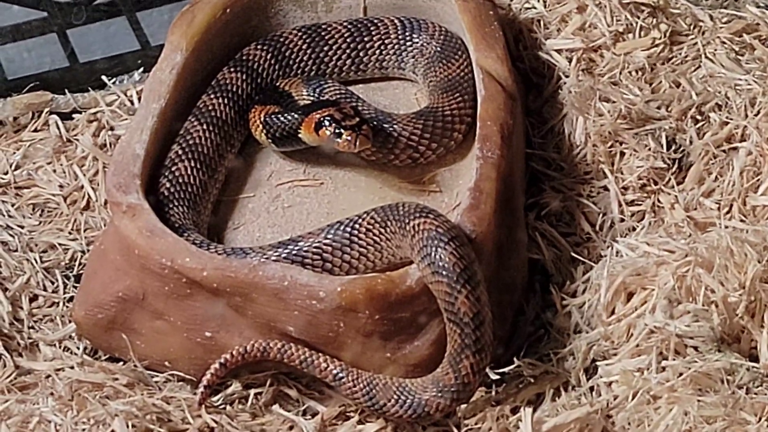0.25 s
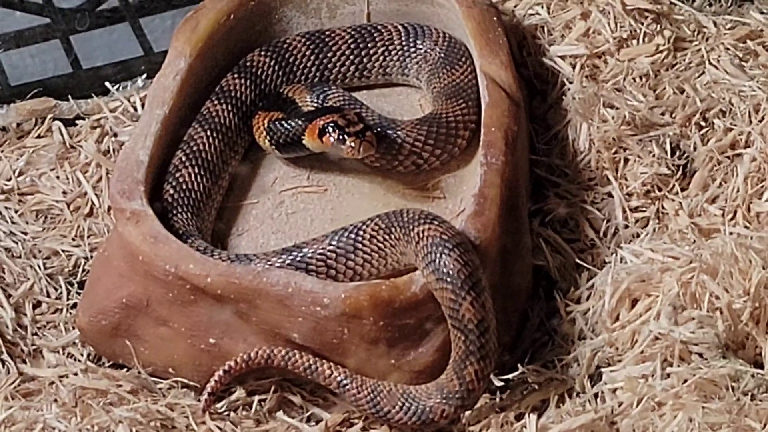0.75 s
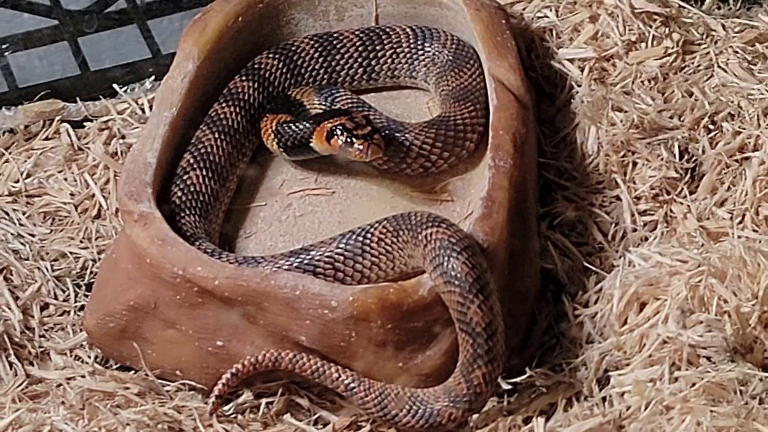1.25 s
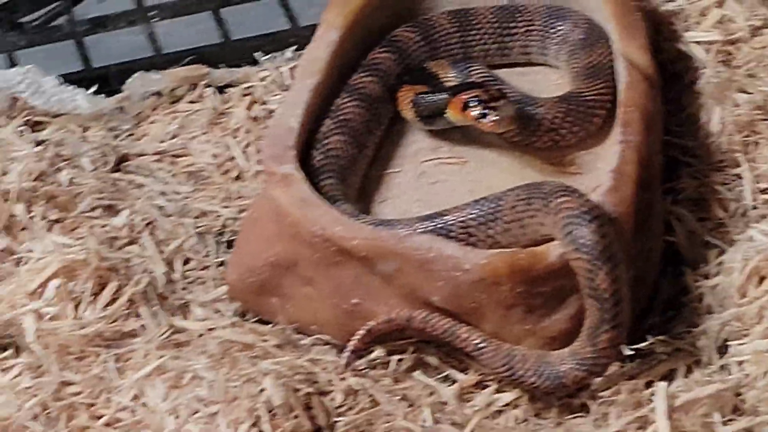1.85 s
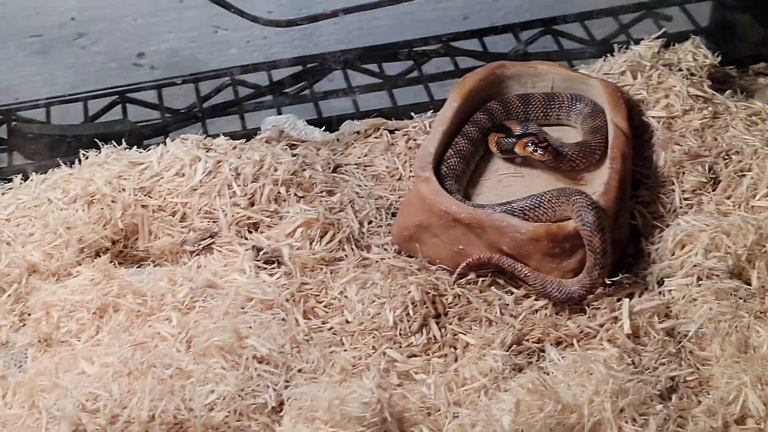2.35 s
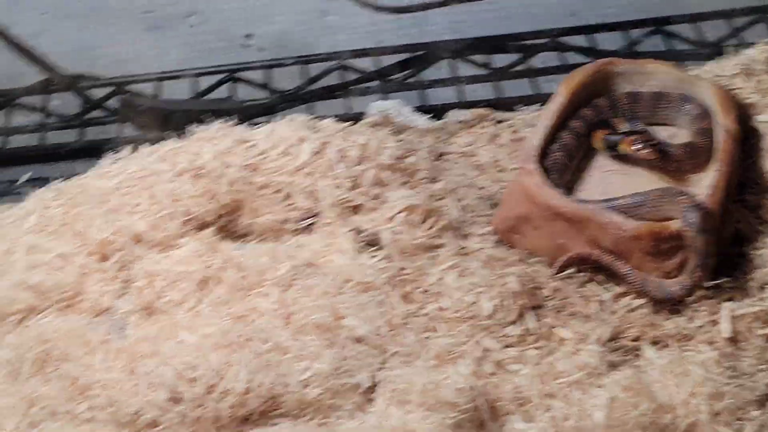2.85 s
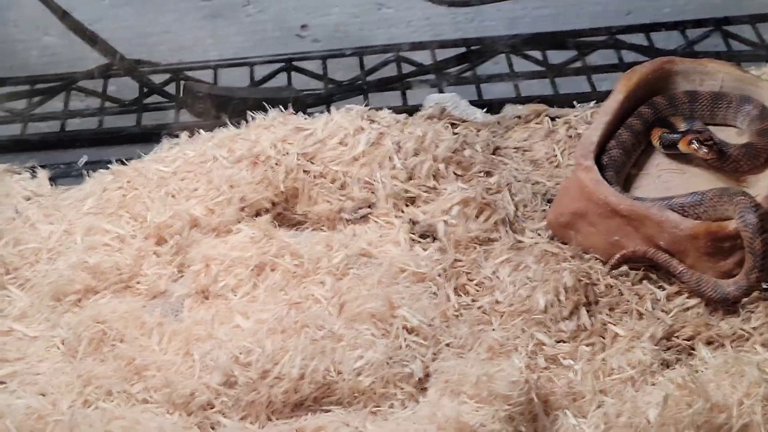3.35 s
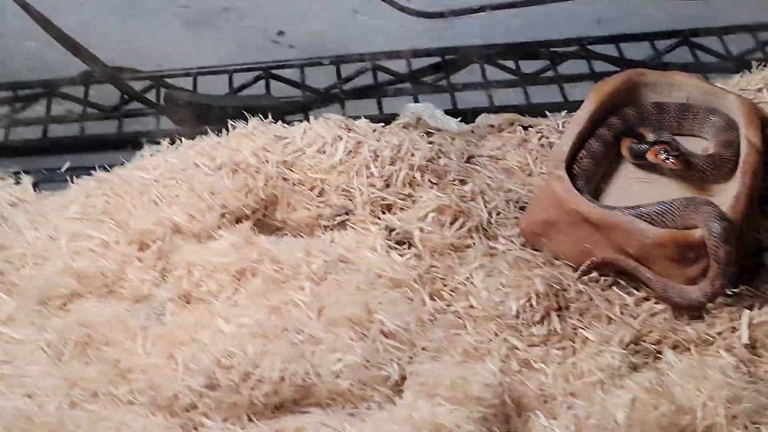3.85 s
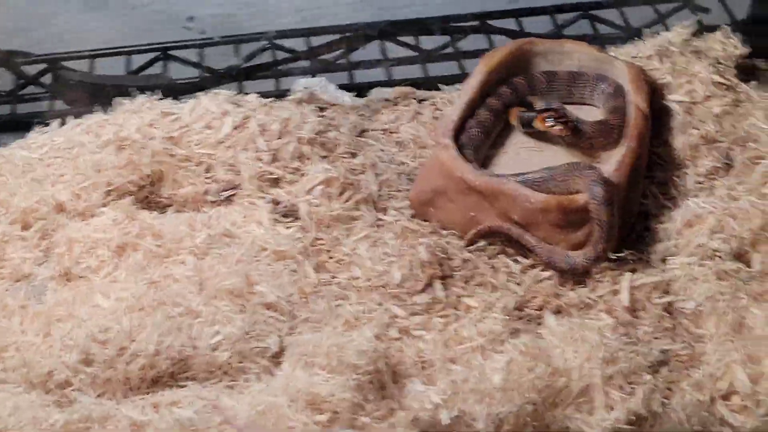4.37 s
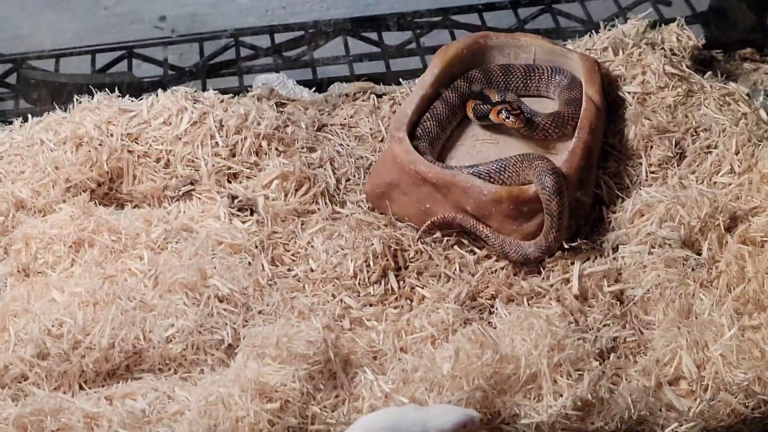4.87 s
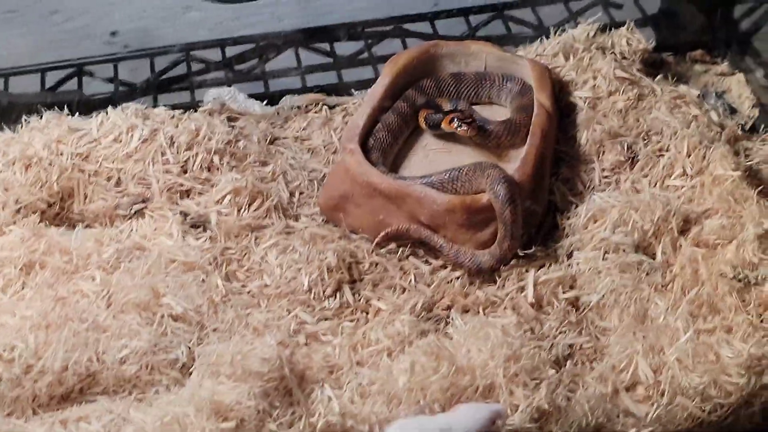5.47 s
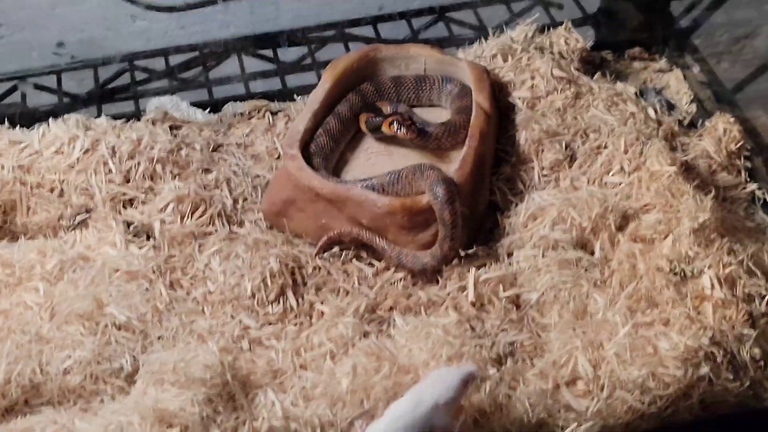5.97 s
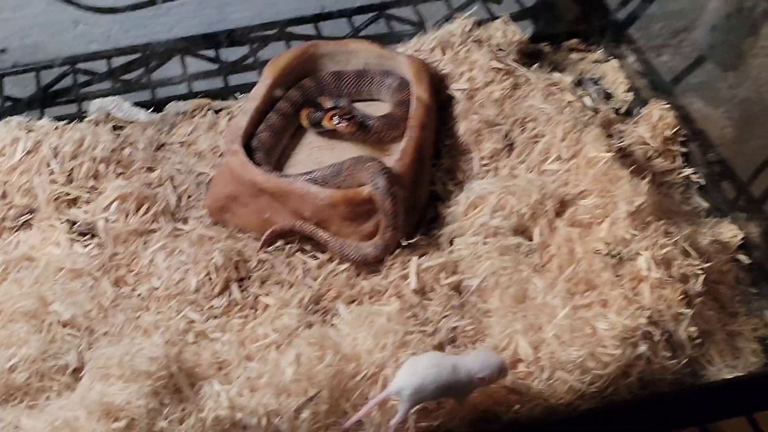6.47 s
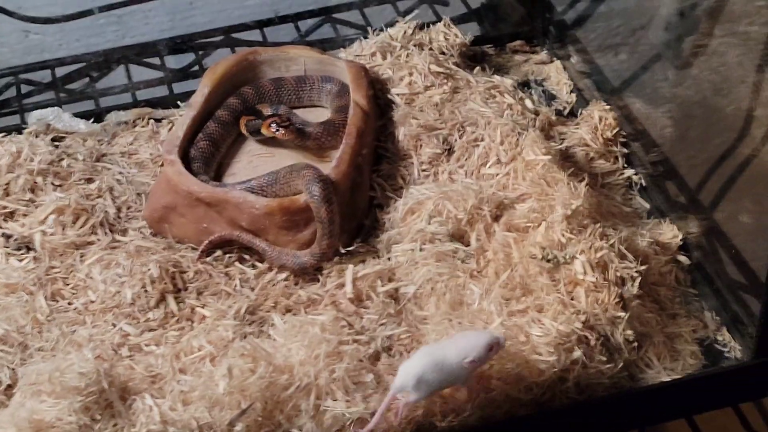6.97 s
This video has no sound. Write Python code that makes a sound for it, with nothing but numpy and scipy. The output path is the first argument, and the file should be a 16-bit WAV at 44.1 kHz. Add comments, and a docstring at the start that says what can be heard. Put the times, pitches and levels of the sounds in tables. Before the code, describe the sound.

A snake whips its tail in dry wood shavings, making a continuous bright, crackly rattle that pulses about twenty times a second. A small bump comes right at the start, a hard dry clack and tiny creak around the middle, then a dull thud. A faint low machine hum and soft rumble fade underneath. Close phone microphone in a small enclosure, moving back after two seconds.

```python
"""Snake tail rattling in wood shavings

A snake in an open enclosure whips its tail in dry shavings, about twenty strokes a second. Each stroke
drives a shower of random clicks, coloured by resonances and by wall echoes that change as the phone moves back.
Filtered noise bursts make bumps and scuffs, struck modes a dry clack, and rough short tones a creak.
A wavering sine is the low hum of a machine, over a soft rumble of filtered noise."""
import sys
import numpy as np
from scipy import signal
from scipy.fft import rfft, irfft
from scipy.io import wavfile
from scipy.ndimage import uniform_filter1d

SR = 44100
rng = np.random.default_rng(int(sys.argv[2]) if len(sys.argv) > 2 else 0)


def wrap_up_sound(samples):
    """Save the sound to the file named by the first command line argument, as 16-bit audio."""
    columns = np.atleast_2d(samples).T
    # keep every value between -1 and 1, then stretch to whole-number steps
    tamed = np.clip(columns, -1, 1)
    steps = np.round(tamed * 32767).astype(np.int16)
    wavfile.write(sys.argv[1], SR, steps)


N = 318402
T = np.arange(N) / SR
FREQS = np.maximum(np.arange(N // 2 + 1) * SR / N, 1)
WALL_T60_S = 0.06  # ring of the rustle between the walls


def undb(db):
    """Decibels to gain."""
    return 10 ** (np.asarray(db) / 20)


def unit(x):
    """Scale to rms 1."""
    return x / np.sqrt(np.mean(x ** 2))


def unit_power(response):
    """Scale a frequency response so that white noise keeps its rms level."""
    return response / np.sqrt(np.mean(abs(response) ** 2))


def curves(table):
    """Each column of a table, joined by straight lines in time."""
    s, *columns = np.transpose(table)
    return [np.interp(T, s, c) for c in columns]


def colour(points):
    """Frequency response through (Hz, dB) points, straight on a log pitch axis."""
    hz, db = np.transpose(points)
    return undb(np.interp(np.log(FREQS), np.log(hz), db))


def resonances(modes):
    """Frequency response of parallel resonators."""
    return sum(undb(db) / (1 + 1j * hz / width * (FREQS / hz - hz / FREQS)) for hz, width, db in modes)


def through(x, response):
    """Filter by a frequency response."""
    return irfft(rfft(x) * response, N)


def bandpass(x, order, low_hz, high_hz):
    """Keep one band of a sound."""
    return signal.sosfilt(signal.butter(order, [low_hz, high_hz], "band", fs=SR, output="sos"), x)


def bump(s, length):
    """A smooth swell and fade around one moment."""
    return np.exp(-(2 * (T - s) / length) ** 2)


def walk(rate_hz):
    """Slow random drift with a spread of 1."""
    return unit(through(rng.standard_normal(N), np.exp(-(FREQS / rate_hz) ** 2) * (FREQS > 1)))


def echoes(x, t60, gap=0.0007):
    """Dense dying reflections after a short gap [s], unrelated at the two microphones."""
    t = T[:SR // 2]
    tail = rng.standard_normal((2, len(t))) * undb(-60 * t / t60) * (t > gap)
    tail /= np.linalg.norm(tail, axis=1)[:, None]
    return signal.fftconvolve(np.atleast_2d(x), tail, axes=1)[:, :N]


def clicks(drive, per_s, spread_db):
    """Shavings snap and collide at random: many small clicks, a few large."""
    size = undb(spread_db * np.minimum(rng.exponential(size=N), 5))
    return drive * unit((rng.random(N) < per_s / SR) * size * rng.choice([-1, 1], N))


# pace of the tail, held until the next row: (time [s], pace [strokes per second])
TAIL_PACE = [(0.0, 19.86), (0.9, 19.29), (1.4, 19.87), (1.6, 18.98), (1.8, 20.64), (2.0, 18.14),
             (2.1, 19.52), (2.4, 22.49), (2.5, 20.02), (3.0, 21.8), (3.1, 19.86), (3.4, 18.3), (3.5, 20.28),
             (3.7, 18.16), (3.8, 19.62), (4.1, 20.99), (4.3, 19.87), (5.1, 19.13), (5.6, 21.57),
             (5.7, 19.14), (6.1, 20.15), (6.4, 19.55), (6.8, 21.0), (7.0, 17.92), (7.1, 21.61)]
# force of the tail before the strokes shape it, faltering near 5.7 s: (time [s], level [dB])
TAIL_FORCE = [(0.0, -37.5), (0.7, -37.5), (0.8, -37), (1.4, -37.5), (1.5, -39), (1.8, -37), (2.1, -40),
              (2.3, -40), (2.5, -39), (2.8, -39.5), (2.9, -38), (3.1, -39.5), (3.2, -38.5), (3.3, -39.3),
              (3.4, -38.5), (3.5, -40), (4.2, -38), (4.7, -39.5), (5.1, -38), (5.3, -41), (5.6, -37),
              (5.7, -42.5), (5.78, -38), (6.1, -39), (6.3, -37), (6.4, -38.5), (6.8, -38), (7.22, -40.3)]


def tail_drive(start_strokes=0.89, bite_at=0.21, catch=0.62, catch_s=0.004):
    """The tail is fastest in mid-stroke and slowest at each turn; one direction digs in harder for a while."""
    swell_db, scatter_db, lead_db = 2.95, 0.9, 0.8
    bite, bite_strokes = 0.58, 0.12  # extra share of force, and how long it lasts
    changes, paces = np.transpose(TAIL_PACE)
    pace = paces[np.searchsorted(changes, T, "right") - 1]
    strokes = start_strokes + np.cumsum(pace) / SR
    angle = 2 * np.pi * strokes
    level_db, = curves(TAIL_FORCE)
    # each stroke has its own strength
    strength_db = scatter_db * rng.uniform(-1.4, 1, N)[strokes.astype(int)]
    swing_db = -swell_db * np.cos(angle)
    # every other stroke goes the other way
    direction_db = lead_db * np.tanh(walk(3.6)) * np.sin(angle / 2)
    sweep = undb(level_db + strength_db + swing_db + direction_db)
    # early in each stroke the tail bites abruptly into the shavings, then lets go
    onset = 1 + bite * np.exp(-((strokes - bite_at) % 1) / bite_strokes)
    # it catches clumps, which rustle on briefly and share the force of the stroke between them
    clumps = (rng.random(N) < 130 / SR) * rng.random(N)
    caught = 1 + catch * signal.lfilter([1], [1, -np.exp(-1 / (catch_s * SR))], clumps)
    caught_share = caught / uniform_filter1d(caught, int(SR / np.mean(paces)))
    return sweep * unit(onset * caught_share)


# colour of the shavings from close by: (frequency [Hz], level per Hz [dB])
NEAR_COLOUR = [(1000, -25.5), (1500, -25.5), (1950, -18.5), (2450, -9), (3450, -10), (3900, -2), (4750, 0),
               (5650, -4.5), (6300, -7), (8400, -6), (9500, -7.5), (10400, -4), (12300, -6.5), (15500, -7)]
# colour of the shavings from further back: (frequency [Hz], level per Hz [dB])
FAR_COLOUR = [(1000, -25), (1500, -26), (1950, -20), (2400, -10), (3450, -8.5), (3750, -2.5), (4800, 0.5),
              (5800, -5.5), (7100, -7.5), (9500, -7.5), (10300, -6), (12700, -7), (13500, -8), (15500, -7)]
# narrow resonances of the rustle: (frequency [Hz], width [Hz], level [dB])
RUSTLE_RESONANCES = [(2520, 210, -12), (3994, 38, -10), (4157, 25, -4), (4468, 27, -5), (4715, 40, -5),
                     (4770, 40, -3.5), (4890, 70, -4.5), (5068, 43, -12), (5450, 54, -12), (6032, 110, -13),
                     (6937, 75, -10), (7138, 86, -7), (7774, 100, -11), (8395, 86, -9), (10720, 40, -8)]
# moments at which the phone has reached a new place: (time [s])
PHONE_PLACES = [0.5, 1.4, 2.0, 2.4, 2.9, 3.4, 4.0, 4.6, 5.2, 5.8, 6.4, 7.0]


def rustle(drive, loose_db=-1.0, gain_db=-1.01, pan_db=-1.14, room_db=-6):
    """Clicks at the tail tip and in loose shavings around it, heard directly and off the walls."""
    direct_db, walls_db, scatter_db = -2.8, -4.2, -6.5
    tip = clicks(drive, per_s=7000, spread_db=4.0)
    # scattered shavings reach each microphone differently
    loose = undb(loose_db) * np.array([clicks(drive, per_s=5000, spread_db=2.5) for _ in range(2)])
    # the tip reaches the right microphone slightly earlier
    tip_pair = np.array([np.roll(tip, SR // 6300), tip])
    out = undb(direct_db) * (tip_pair + loose)
    # a third shower is scattered through the bedding
    out = out + undb(scatter_db) * echoes(clicks(drive, per_s=3000, spread_db=5.5), 0.04)
    for share in np.eye(len(PHONE_PLACES)):
        # every place has its own pattern of reflections, a fine comb of peaks
        presence = np.sqrt(np.interp(T, PHONE_PLACES, share))
        out = out + undb(walls_db) * echoes((tip + loose) * presence, WALL_T60_S, gap=.002)
    # the room keeps a slightly darker rustle ringing between the strokes
    darker = colour([(2700, 0), (4200, 0), (8000, -3)])
    out = out + undb(room_db) * through(echoes(tip, 0.27, gap=.012), darker)
    ring = 1 + resonances(RUSTLE_RESONANCES)
    near = through(out, unit_power(ring * colour(NEAR_COLOUR)))
    far = through(out, unit_power(ring * colour(FAR_COLOUR)))
    back = np.interp(T, [1.7, 2.3], [0, 1])
    return (near * (1 - back) + far * back) * undb(gain_db + np.array([[pan_db], [-pan_db]]) / 2)


# strokes in which shavings snap loudly: (time [s], level [dB], t60 [s])
LOUD_SNAPS = [(0.272, -41, .05), (1.185, -40, .06), (1.752, -40, .06), (1.802, -40, .06), (2.906, -39, .07),
              (3.146, -40.5, .05), (3.6535, -33, .055), (3.7545, -33, .035), (4.259, -37, .06),
              (6.596, -39, .06), (6.795, -38.5, .05)]


def snaps(ring_hz=4850, width_hz=800, walls_db=-6):
    """A sudden burst of crackle rings one bright resonance and dies in about a stroke."""
    burst = sum(undb(db - 60 * np.maximum(T - s, 0) / t60) * (T >= s) for s, db, t60 in LOUD_SNAPS)
    response = resonances([(ring_hz, width_hz, 0)]) * colour(FAR_COLOUR)
    ring = through(clicks(burst, per_s=12000, spread_db=1), unit_power(response))
    return ring + undb(walls_db) * echoes(ring, WALL_T60_S)


# the hollow dish and the floor under it: (frequency [Hz], width [Hz], level [dB])
DISH_RESONANCES = [(353, 220, -15), (658, 19, -14), (757, 32, 4.5), (980, 92, -6), (1860, 970, -8.5)]


def dish(drive, gain_db=-27, wide_db=-4):
    """The same strokes faintly ring the dish."""
    tilt = colour([(100, 1), (300, 4.5), (1800, -6.0), (4000, 14.5)])
    body = unit(through(clicks(drive, per_s=1500, spread_db=4.5), resonances(DISH_RESONANCES) * tilt))
    drive_rms = np.sqrt(np.mean(drive ** 2))
    return undb(gain_db) * drive_rms * (body + undb(wide_db) * echoes(body, 0.22, gap=0.0026))


# modes of the enclosure: (frequency [Hz], width [Hz], level [dB])
BOX_RESONANCES = [(133, 22, 11), (212.5, 23, 6.5), (345, 22, 0), (420, 35, -7), (647, 59, 4.5)]
# knocks and bumps: (time [s], level [dB], lowest [Hz], highest [Hz], t60 [s], room send [dB])
BUMPS = [ (0.106, -45, 180, 276, 0.087, -14), (0.189, -33.5, 400, 700, 0.03, 2),
         (0.190, -44, 100, 420, 0.23, -5.5), (0.202, -29.5, 440, 700, 0.02, -12),
         (1.115, -52, 197, 285, 0.087, -21), (1.19, -54, 190, 280, 0.06, -20),
         (1.229, -41.5, 140, 254, 0.12, -18), (1.236, -48, 525, 740, 0.11, 0),
         (2.009, -49, 100, 420, 0.19, -9), (3.712, -51, 285, 695, 0.1, -0.5),
         (4.107, -27.5, 190, 445, 0.0071, -21), (4.119, -42, 25, 86, 0.13, -17),
         (4.745, -54.5, 500, 1500, 0.03, -6), (6.055, -43, 60, 300, 0.014, -18)]


def knocks(plain_db=-2, push=1.1, side_db=-8, room_t60=0.26):
    """Short rough contacts, each in its own band, ring the modes of the enclosure."""
    dry, sent = np.zeros((2, N)), np.zeros(N)
    t = T[:SR // 2]
    box = irfft(undb(plain_db) + resonances(BOX_RESONANCES), N)[:len(t)]
    for s, db, low_hz, high_hz, t60, room_db in BUMPS:
        contact = rng.standard_normal((2, len(t))) * np.exp(-np.log(1000) * t / t60)
        # a clean push starts the rough contact
        contact[0, 0] += push * np.linalg.norm(contact[0])
        contact = bandpass(contact, 3, low_hz, high_hz)
        blow = signal.fftconvolve(contact, box[None], axes=1)[:, :len(t)]
        # the level is that of the first moment of the decay
        decay_energy = t60 * SR / (2 * np.log(1000))
        blow *= undb(db) * np.sqrt(decay_energy / np.sum(blow ** 2, axis=1, keepdims=True))
        mid, side = blow
        i = int(s * SR)
        dry[:, i:i + len(t)] += (mid + undb(side_db) * np.array([side, -side]))[:, :N - i]
        sent[i:i + len(t)] += undb(room_db) * mid[:N - i]
    return dry + echoes(sent, room_t60, gap=0.0056)


# contacts of one hard, dry clack: (time [s], peak level [dB])
CLACK_CONTACTS = [(3.5325, -43), (3.5383, -22), (3.5425, -39), (3.5485, -39)]
# what the clack rings with: (frequency [Hz], width [Hz], level [dB])
CLACK_RESONANCES = [(330, 120, -12), (560, 290, 2), (850, 100, -4), (1160, 61, -4), (1700, 210, 3)]


def clack(top_hz=1980, crack_db=-20, room_db=-21):
    """A graze, a hard contact and two small rebounds ring damped modes, each with a thin crack on top."""
    contacts = sum(undb(db) * (np.arange(N) == int(s * SR)) for s, db in CLACK_CONTACTS)
    body = bandpass(through(contacts, resonances(CLACK_RESONANCES)), 9, 220, top_hz)
    crack = bandpass(contacts, 4, 2200, 3500)
    ring = body / np.max(abs(body)) + undb(crack_db) * crack / np.max(abs(crack))
    ring = np.max(contacts) * ring
    return ring + undb(room_db) * echoes(ring, 0.07, gap=.005)


# a short creak that catches on several pitches: (time of peak [s], pitch [Hz], level [dB], length [s])
CREAK_TONES = [(3.934, 980, -48.5, 0.015), (3.937, 2000, -45, .02), (3.947, 290, -52, 0.05),
               (3.95, 500, -50.5, 0.027), (3.967, 430, -48.5, 0.021), (3.968, 800, -50, 0.03),
               (3.966, 2060, -54, .035)]


def creak(rough=0.59, room_db=-9):
    """Something rubs and sticks, sounding a quick cluster of short tones roughened in phase [rad]."""
    out = 0
    for s, hz, db, length in CREAK_TONES:
        tone = np.sqrt(2) * np.sin(2 * np.pi * hz * T + rough * walk(130))
        out = out + undb(db) * bump(s, length) * tone
    return out + undb(room_db) * echoes(out, 0.11)


# faint scuffs and scrapes: (time of peak [s], level [dB], length [s], lowest [Hz], highest [Hz])
SOFT_SCUFFS = [(0.198, -50.5, 0.034, 1320, 2200), (0.453, -57.5, 0.035, 200, 650),
               (1.233, -55, 0.06, 400, 830), (1.24, -58, 0.06, 990, 2000), (2.368, -61.5, 0.026, 200, 650),
               (3.96, -56, 0.056, 298, 1490), (4.483, -59, 0.04, 179, 640), (5.118, -66, 0.15, 200, 650),
               (5.38, -64.5, 0.2, 200, 640), (6.27, -64.5, 0.091, 250, 850)]


def scuffs(room_db=-8):
    """Soft rubbing, as banded noise, swells and fades around and between the knocks."""
    noise, rub = rng.standard_normal(N), 0
    for s, db, length, low_hz, high_hz in SOFT_SCUFFS:
        rub = rub + undb(db) * bump(s, length) * unit(bandpass(noise, 2, low_hz, high_hz))
    return rub + undb(room_db) * echoes(rub, 0.19)


# the hum rises a little in pitch, then fades as the phone moves back: (time [s], level [dB], pitch [Hz])
MACHINE_HUM = [(0.0, -51, 63.6), (1.3, -56.5, 63.8), (1.8, -55, 66.48), (4.2, -61.5, 67), (5.4, -65, 66.5),
               (7.2, -75, 66.4)]
# colour of the still air: (frequency [Hz], level per Hz [dB])
AIR_COLOUR = [(25, -4), (45, 15), (90, 6), (130, -0.5), (200, -12.5), (400, -17), (700, -8.5), (1300, -22),
              (3000, -70), (15000, -34)]
# rumble of the room: (time [s], level [dB])
RUMBLE_LEVEL = [(0, -57.5), (.8, -59.5), (2, -61.5), (3.5, -63), (5.5, -67.5), (7.2, -66)]


def room(waver_db=1, drift=0.25, side_db=-7):
    """A machine hum, wavering in level and phase [rad], over a soft rumble mostly alike on both sides."""
    level_db, hz = curves(MACHINE_HUM)
    air_db, = curves(RUMBLE_LEVEL)
    phase = 2 * np.pi * np.cumsum(hz) / SR + drift * walk(3)
    hum = np.sqrt(2) * np.sin(phase) * undb(level_db + waver_db * walk(12.0))
    mid, side = unit(through(rng.standard_normal((2, N)), colour(AIR_COLOUR)))
    return hum + undb(air_db) * (mid + undb(side_db) * np.array([side, -side]))


def scene():
    """Tail, knocks and room together."""
    drive = tail_drive()
    tail = rustle(drive) + snaps() + dish(drive)
    return tail + knocks() + clack() + creak() + scuffs() + room()


def record(dry):
    """The phone cuts the top steeply."""
    return signal.sosfilt(signal.ellip(12, .1, 70, 15750, fs=SR, output="sos"), dry)


dry = scene()
out = record(dry)
wrap_up_sound(out)
```